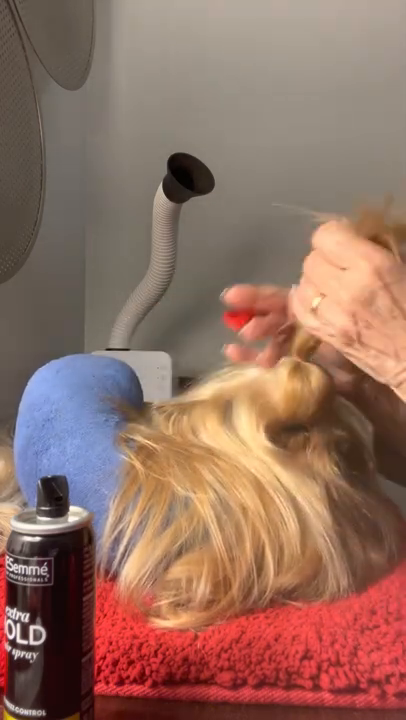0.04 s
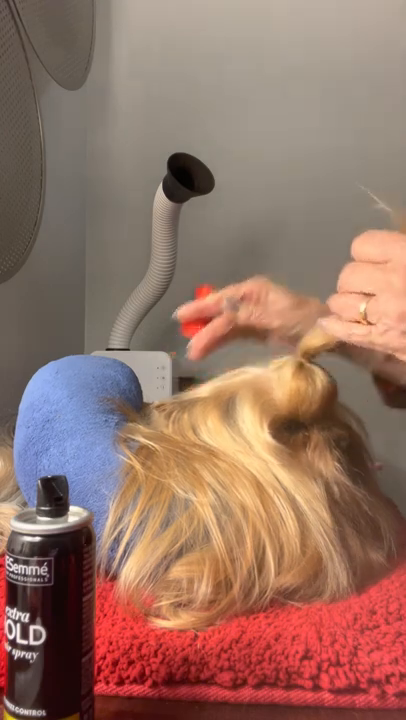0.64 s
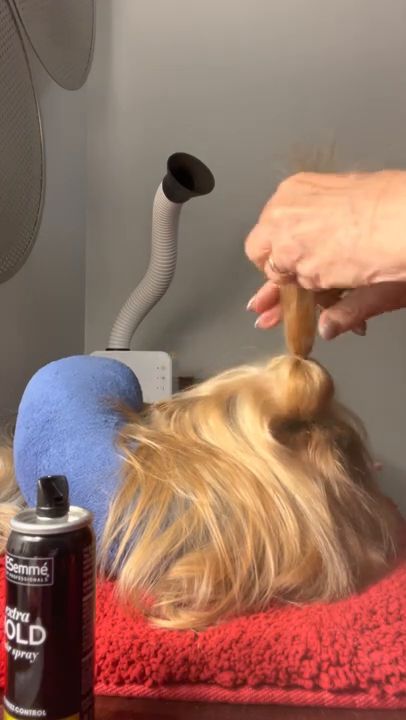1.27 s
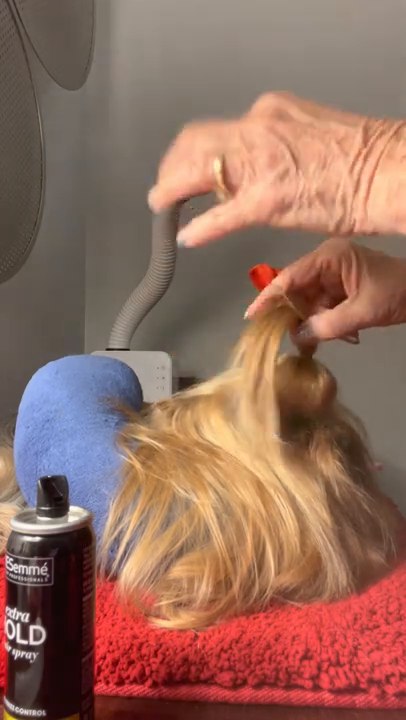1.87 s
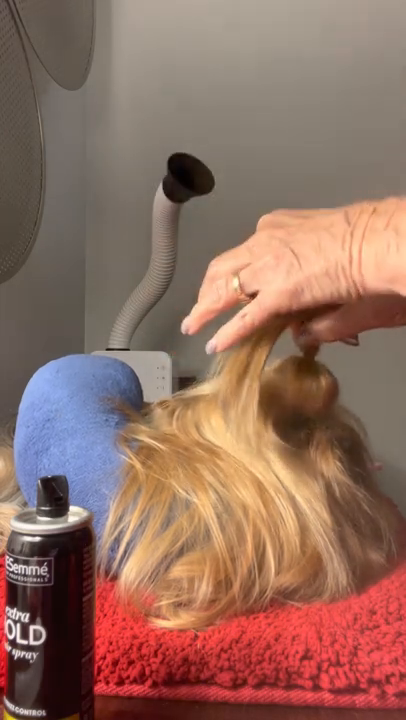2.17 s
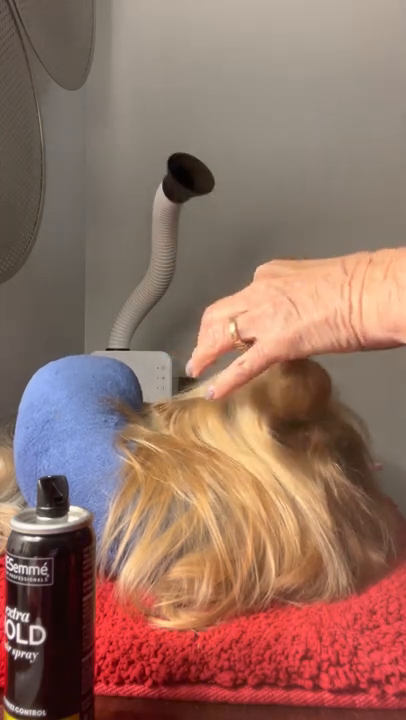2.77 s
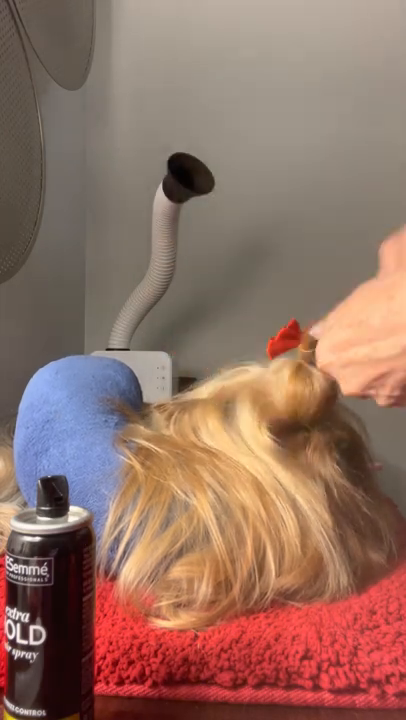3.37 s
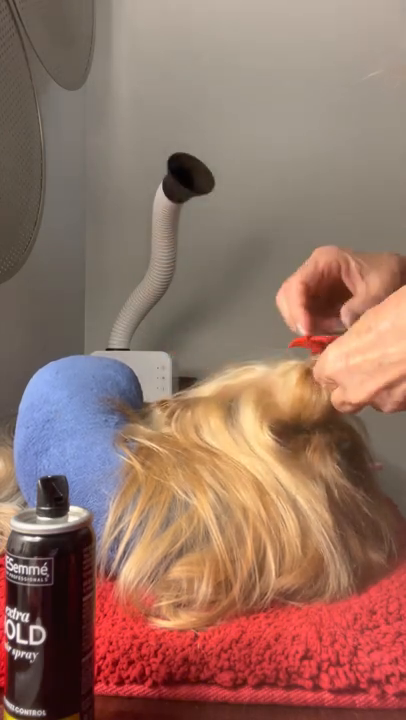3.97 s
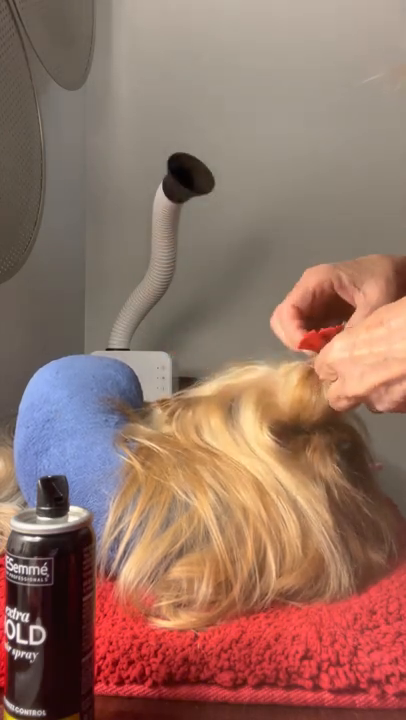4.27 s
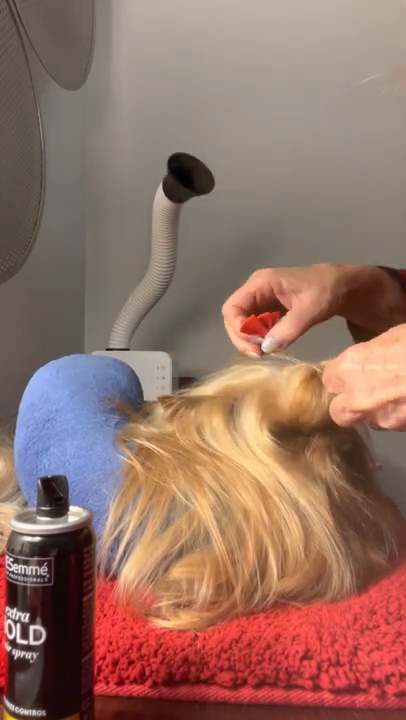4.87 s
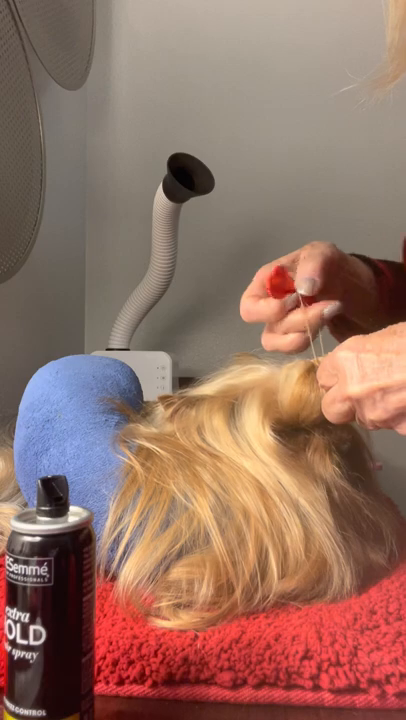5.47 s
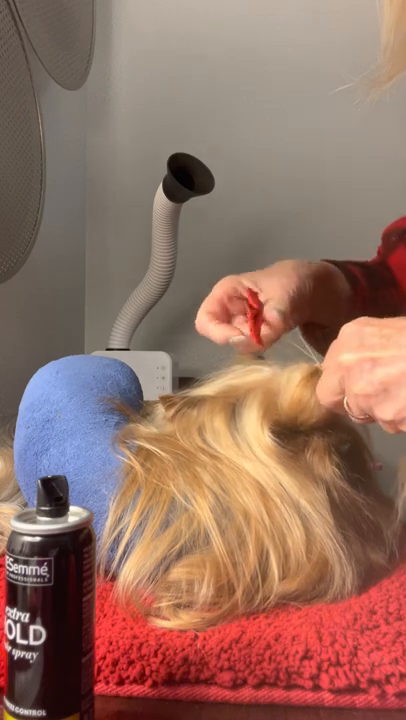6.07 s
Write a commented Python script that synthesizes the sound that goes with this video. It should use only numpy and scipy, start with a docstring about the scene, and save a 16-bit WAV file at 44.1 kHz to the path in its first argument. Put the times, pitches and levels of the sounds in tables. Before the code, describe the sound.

Close, quiet handling sounds in a small room, over the steady low hum of a fan. First comes a cloth swish and a muffled table thump, then light hissy strokes of fingers on hair and one sharp click of a small metal clasp. In the second half, hair and an elastic band crackle and rasp between the fingers, with a couple of dull flicks and one crisp slap shortly before the end.

```python
"""A small room with a grooming table, where a fan motor hums and stirs the air.
Hands gather a dog's topknot and ready a small bow. A sleeve brushes past and the forearm bumps the
table. Hair and an elastic band rub through the fingers by stick-slip friction, the band flicks and
slaps back, and a little metal clasp snaps shut and rings in its free modes.
Two close microphone ports hear it all."""
import sys
import numpy as np
from scipy import signal
from scipy.fft import rfft, irfft
from scipy.io import wavfile

SR = 44100
rng = np.random.default_rng(int(sys.argv[2]) if len(sys.argv) > 2 else 0)


def output_pcm(signal):
    """Save a mono or channel-first signal as 16-bit PCM at the path in sys.argv[1].

    Samples are clipped to [-1, 1] before scaling.
    """
    pcm = np.clip(np.atleast_2d(signal).T, -1, 1) * 32767
    wavfile.write(sys.argv[1], SR, np.round(pcm).astype(np.int16))


N = 269892
TIME = np.arange(N) / SR
FREQS = np.arange(N // 2 + 1) * SR / N
SIDES = np.array([[.5], [-.5]])  # splits a difference between left and right


def from_db(db):
    """Amplitude grows tenfold for every 20 dB."""
    return 10 ** (np.asarray(db) / 20)


def unit_rms(x):
    """Normalisation to unit mean power."""
    return x / np.sqrt(np.mean(x ** 2) + 1e-20)


def at_hz(points, hz):
    """Interpolation on a logarithmic frequency axis."""
    freqs, values = np.transpose(points)
    return np.interp(np.log(hz + 0.00092), np.log(freqs), values)


def drift(rate_hz):
    """Low-passed noise: a random fluctuation of unit spread."""
    return unit_rms(irfft(rfft(rng.standard_normal(N)) / (1 + (FREQS / rate_hz) ** 2), N))


def colour(x, spectrum):
    """A minimum-phase filter of unit power gain, falling away below the spectrum's first point."""
    roll_off = np.clip(FREQS / spectrum[0][0], .01, 1) ** 2
    gain = unit_rms(from_db(at_hz(spectrum, FREQS)) * roll_off)
    cepstrum = irfft(np.log(gain), N)
    cepstrum[1:N // 2] *= 2
    cepstrum[N // 2 + 1:] = 0
    return irfft(rfft(x) * np.exp(rfft(cepstrum)), N)


def resonance(x, hz, width_hz):
    """A second-order resonator with unit gain at its centre."""
    return signal.lfilter(*signal.iirpeak(hz, hz / width_hz, fs=SR), x + 1e-18)


def narrowband(x, hz, width_hz):
    """A resonator scaled to conserve the power of white noise."""
    return np.sqrt(SR / (np.pi * width_hz)) * resonance(x, hz, width_hz)


def passband(x, hz, kind, order=2):
    """A maximally flat low-, high- or band-pass filter."""
    return signal.sosfilt(signal.butter(order, hz, kind, fs=SR, output="sos"), x + 1e-18)


def friction(slips_per_s, grain, flutter_db):
    """Stick-slip noise: countless tiny slips and a few larger ones, under an uneven grip."""
    large_slips = unit_rms((rng.random(N) < slips_per_s / SR) * rng.standard_normal(N))
    grip_db = flutter_db * (drift(37) + drift(300))  # changing pressure, and strands letting go
    return unit_rms((rng.standard_normal(N) + grain * large_slips) * from_db(grip_db))


def burst(start, decay_s):
    """Crowded micro-impacts make noise with an exponential decay."""
    envelope = (TIME >= start) * np.exp(-np.clip((TIME - start) / decay_s, 0, 40))
    return envelope * rng.choice([-1, 1], N)


def short_bursts(rows):
    """Exponential decay: each burst of noise dies within milliseconds."""
    noise = np.zeros(N)
    for start, db, decay_s in rows:
        at = round(start * SR)
        age = TIME[:min(SR // 40, N - at)]
        noise[at:at + len(age)] += from_db(db) * np.exp(-age / decay_s) * rng.choice([-1, 1], len(age))
    return noise


# Each row: frequency in Hz, coherence between the ports from 0 to 1.
COHERENCE = [(50, 0.3), (90, 0.5), (140, 0.6), (230, 0.4), (420, 0.2), (550, 0.89), (950, 1), (1400, 0.5),
             (2100, 0.64), (4600, 0.4), (7000, 1), (10500, 0.7), (12500, 1)]

def diffuse(pair):
    """A diffuse field arrives from all around, so it is only partly coherent at two points."""
    coherence = np.clip(at_hz(COHERENCE, FREQS), 0, 1)
    mid, side = rfft(pair)
    return irfft(np.sqrt((1 + coherence) / 2) * mid + np.sqrt((1 - coherence) / 2) * side * [[1], [-1]], N)


# Each row: frequency in Hz, reverberation time in seconds.
TAIL_T60 = [(300, 0.5), (3000, 1.18), (9000, 0.76), (16000, 2.5)]
# Each row: frequency in Hz, relative level of the tail in dB.
TAIL_SPECTRUM = [(400, 11.5), (2500, 1.5), (6000, -15), (11000, -12.5), (15000, -16.5)]

def room(x, early_db=-11, early_t60=0.17, tail_db=-16, gap_s=0.0025):
    """Reverberation: early reflections from table and wall, then a faint tail, weaker in the treble."""
    age = TIME[:SR * 3 // 4]
    onset = np.clip(age / gap_s - 1, 0, 1)
    early = rng.standard_normal((2, len(age))) * onset * 1000 ** (-age / early_t60)
    tail = 0
    edges_hz = [100, 1500, 4000, 7000, 10000, 13000, 18000]
    for low, high in zip(edges_hz, edges_hz[1:]):
        noise = passband(rng.standard_normal((2, len(age))), [low, high], "band")
        hz = np.sqrt(low * high)
        decay = 1000 ** (-age / at_hz(TAIL_T60, hz))
        tail += from_db(at_hz(TAIL_SPECTRUM, hz)) * noise * onset * decay
    response = (from_db(early_db) * unit_rms(early) + from_db(tail_db) * unit_rms(tail)) / np.sqrt(len(age))
    return diffuse(signal.fftconvolve(x[None], response, axes=1)[:, :N])


# Each row: frequency in Hz, relative spectral density in dB.
AIR_SPECTRUM = [(27, 0), (38, 6), (75, 5.5), (95, -3.5), (140, -5.5), (250, -10), (350, -20), (550, -19.5),
                (850, -23.5), (1400, -32), (2400, -41.5), (3500, -46.5), (5000, -52.5), (15000, -58)]
# Each row: resonance frequency in Hz, bandwidth in Hz, lift in dB.
HOUSING_MODES = [(299, 18, 5), (359, 12, 1), (811, 110, 2.5), (1160, 45, 2), (2056, 290, 7.5),
                 (2640, 84, 10), (3150, 170, 3)]

def fan_air(level_db=-47.5):
    """Broadband flow noise: a steady, dull rush lifted at the resonances of the fan's housing."""
    rush = colour(rng.standard_normal((2, N)), AIR_SPECTRUM)
    for hz, width_hz, lift_db in HOUSING_MODES:
        rush += (from_db(lift_db) - 1) * resonance(rush, hz, width_hz)
    return from_db(level_db) * diffuse(rush)


def wavering(hz, depth):
    """Random modulation in quadrature makes a tone wander in strength and phase."""
    phase = 2 * np.pi * (hz * TIME + rng.random())
    return (1 + depth * drift(5.7)) * np.sin(phase) + depth * drift(8.8) * np.cos(phase)


# Each row: time in seconds, relative level of the fundamental in dB.
HUM_LEVELS = [(0.0, -45), (0.07, -45), (0.31, -43), (0.38, -40), (0.59, -42), (0.65, -50.5), (0.87, -49),
              (0.9, -40.5), (1.29, -42.5), (1.53, -54), (1.6, -43.5), (1.76, -39), (1.92, -42), (2.15, -52),
              (2.42, -36), (2.8, -43.5), (3.2, -49), (3.29, -41), (3.6, -38.5), (3.94, -41), (4.0, -47.5),
              (4.42, -51), (4.81, -44), (5.45, -45.5), (5.74, -52), (6.12, -44)]
# Each row: time in seconds, left minus right level in dB before centring and scaling.
HUM_BALANCE = [(0.0, -7), (0.17, 3.5), (0.56, -15.5), (0.87, 3), (1.33, -20.5), (1.4, -7), (2.64, -5),
               (2.91, -19.5), (3.17, -2), (3.97, -16), (4.45, 4.5), (5.52, -21.5), (5.88, 11), (6.12, -6.5)]
# Each row: time in seconds, relative level of the second harmonic in dB.
OCTAVE_LEVELS = [(0.0, -66), (0.44, -55.5), (1.96, -58), (2.01, -66.5), (2.9, -52), (2.98, -69),
                 (3.05, -52.5), (4.96, -60), (5.08, -48), (5.78, -61.5), (5.86, -51.5), (6.12, -60)]
# Each row: frequency of a weaker tone in Hz, relative level in dB.
MOTOR_TONES = [(177.6, -62.5), (254, -66), (297, -68), (319, -65.5), (379, -78.5), (403.7, -69), (575, -78),
               (1497, -83), (2286, -102.5)]

def fan_motor(hum_hz=59.33, whine_hz=516.4):
    """Modulated tonal noise: a hum that swells and sways between the ears, under wavering tones."""
    phase = 2 * np.pi * hum_hz * TIME + 0.94 * drift(2.3)
    hum_db = np.interp(TIME, *np.transpose(HUM_LEVELS)) + 0.33 + 0.5 * drift(7.9)
    sway_db = np.interp(TIME, *np.transpose(HUM_BALANCE))
    balance_db = 0.83 * (sway_db - sway_db.mean()) - 0.3
    pan = from_db(balance_db * SIDES) / np.cosh(np.log(from_db(balance_db)) / 2)
    hum = pan * from_db(hum_db) * np.sin(phase + 0.64 * drift(0.73) * SIDES)
    octave_db = np.interp(TIME, *np.transpose(OCTAVE_LEVELS)) - 0.5
    octave = from_db(octave_db) * wavering(2 * hum_hz, depth=0.49)
    tones = sum(from_db(db - 4) * wavering(hz, depth=0.57) for hz, db in MOTOR_TONES)
    whine = from_db(-66) * wavering(whine_hz, depth=0.5)
    whine_rush = from_db(-68) * unit_rms(resonance(rng.standard_normal(N), whine_hz, width_hz=30))
    return np.sqrt(2) * (hum + octave + tones + whine) + whine_rush


# Each row: start in seconds, envelope peak in dB, frequency in Hz.
TABLE_BUMPS = [(0.341, -38, 137.2), (0.528, -47.5, 188)]

def table_bumps(swell_s=0.013):
    """Damped vibration: bumped by the forearm, the padded table swings up and dies away."""
    bumps = np.zeros(N)
    for start, db, hz in TABLE_BUMPS:
        age = np.maximum(TIME - start, 0)
        rise = age / swell_s
        envelope = rise * np.exp(1 - rise) * (rise < 20)
        bumps += from_db(db) * envelope * np.sin(2 * np.pi * hz * age)
    return bumps


# Each row: start in seconds, level in dB, centre frequency in Hz.
SLEEVE_FOLDS = [(.303, -55.5, 1710), (.323, -52.5, 1500), (0.336, -53, 3560), (0.338, -44.5, 880),
                (0.344, -47, 720), (0.345, -50.5, 238), (0.346, -59, 1970), (0.36, -53, 2300),
                (0.366, -51, 573), (.398, -59, 1590), (0.422, -48.5, 1640), (0.426, -54, 2340),
                (0.436, -57, 1560), (0.446, -53.5, 2280), (0.455, -61, 2800), (0.515, -53, 1500),
                (0.522, -47, 770), (0.527, -59, 2400)]

def folds(rise_s=0.0011, settle_s=0.007, cycles=2.8):
    """Heavily damped resonance: folds flop with hollow puffs, larger ones lower and longer."""
    puffs = np.zeros(N)
    for start, db, hz in SLEEVE_FOLDS:
        flop = np.clip((TIME - start) / rise_s, 0, 1) * burst(start, settle_s + cycles / hz)
        puffs += from_db(db) * narrowband(flop, hz, width_hz=0.4 * hz)
    return passband(puffs, 3800, "low")


# Each row of both: frequency in Hz, relative spectral density in dB.
DRAG_SPECTRUM = [(90, 4.5), (140, 23), (220, 1), (400, -7), (800, 3), (1150, -1), (2300, -2.5),
                 (3200, -8.5), (5000, -12), (9000, -27)]
FIBRE_SPECTRUM = [(2000, -2), (5000, -2), (8000, -4.5), (11000, -8.5), (15500, -10)]

def sleeve(touch_s=0.14, full_speed_s=0.34, slowing_s=0.44, leave_s=0.9):
    """Sliding friction grows with speed: in one pass the cloth drags, its fibres hiss, its folds flop."""
    before, after = np.maximum(full_speed_s - TIME, 0), np.maximum(TIME - slowing_s, 0)
    apart = np.maximum(touch_s - TIME, 0) + np.maximum(TIME - leave_s, 0)
    drag_db = -61.5 - 9 * before - 37 * after  # slopes in dB per second
    flurry_db = 6.5 * np.exp(-((TIME - 0.525) / 0.019) ** 2)  # the last fold slides off
    hiss_db = -63 - 49 * before - 33.5 * after - 131 * apart + flurry_db
    drag = colour(friction(slips_per_s=510, grain=0.46, flutter_db=0), DRAG_SPECTRUM)
    hiss = colour(friction(slips_per_s=1500, grain=0.1, flutter_db=0.8), FIBRE_SPECTRUM)
    return from_db(drag_db) * drag + from_db(hiss_db) * hiss + folds()


def stroke(start, length, db, swell_db=3, attack_s=0.0018, release_s=0.0045, graze_s=0.02):
    """Friction follows tension: the skin grazes, grips and rubs harder until the strands slip free."""
    before, after = np.maximum(start - TIME, 0), np.maximum(TIME - start - length, 0)
    tension = np.clip((TIME - start) / length, 0, 1)
    grip = np.exp(-np.minimum(before / attack_s + after / release_s, 20))
    graze = from_db(-12.5) * np.exp(-np.minimum((before + after) / graze_s, 20))
    return from_db(db + swell_db * (tension - 1.5)) * np.maximum(grip, graze)


def stray_strands(from_s=4.0, per_s=31, db=-60, decay_s=0.0004):
    """A random point process: single strands catch and crackle while the band is worked."""
    caught = (rng.random(N) < per_s / SR) & (TIME > from_s)
    return short_bursts([(start, db, decay_s) for start in TIME[caught]])


def shifting_grip(hiss, spread_db=3):
    """Band-wise modulation: as the grip moves along the strands, parts of the treble come and go."""
    centres_hz = np.linspace(3000, 15000, 6)
    spectrum = rfft(hiss)
    bands = [irfft(spectrum * np.interp(FREQS, centres_hz, share), N) for share in np.eye(6)]
    return sum(band * from_db(spread_db * drift(42)) for band in bands)


# Finger strokes, except at 2.551 s: that row is a faint, brief hiss just before the snap.
# Each row: start in seconds, length in seconds, level in dB, relative pinch level in dB, tilt in dB.
HISSES = [(0.115, 0.022, -70, -20, 18), (0.746, 0.037, -67, -5, -1), (1.558, .11, -86, -11, 14),
          (2.392, 0.04, -61, -7, 0.5), (2.49, 0.0093, -56.5, -6, -2), (2.512, 0.03, -59, -10, 5),
          (2.551, 0.012, -51, -10, 10), (2.596, 0.027, -60.5, 0.5, -4), (2.642, 0.057, -64, -5.5, -3),
          (2.734, 0.16, -76, -4, 3), (2.93, 0.027, -67.5, -5, 1.5), (3.005, 0.0037, -56, -5, 5),
          (3.229, 0.13, -81, 3, 8), (3.493, 0.027, -69.5, -3.5, -2), (4.003, 0.086, -69, -1.5, 6),
          (4.177, 0.038, -65, -5, 5), (4.341, 0.014, -58, -2.5, 6), (4.377, 0.16, -74, -0.5, 6),
          (4.475, 0.012, -70, -1, 2), (4.506, 0.033, -61.5, -7, -1), (4.535, 0.109, -60, -7, -1),
          (4.685, 0.018, -64, -7, 8), (4.977, 0.009, -64.5, -10, 1), (4.985, 0.031, -58, -6.5, -2),
          (5.031, 0.047, -66, -9.5, 5), (5.139, 0.021, -65, -18.5, 4), (5.358, 0.056, -69, -2.5, 4),
          (5.487, 0.014, -52, -10.5, 3), (5.511, 0.047, -66.5, -4, 4), (5.644, 0.006, -46, -11.5, 3),
          (5.678, 0.021, -55.5, -4, 5), (5.707, 0.016, -55.5, -5, 8), (5.803, 0.01, -50.5, -3, 4),
          (5.909, 0.0087, -56.5, -10, 4), (5.928, 0.057, -52.5, -8.5, 7), (6.096, 0.023, -61, -10, 5)]
# Nails and catching strands. Each row: start in seconds, relative level in dB.
NAIL_TICKS = [(1.1234, -57.5), (1.4285, -55.5), (2.138, -59), (2.174, -59), (2.256, -51.5), (2.3846, -44),
              (2.431, -49), (2.478, -41), (2.4887, -41), (2.4932, -51), (2.4995, -46), (2.536, -41.5),
              (3.317, -58.5), (3.489, -42.5), (4.0005, -42), (4.005, -48), (4.032, -43.5), (4.0615, -43.5),
              (4.159, -58), (4.356, -47), (4.6365, -44), (4.6809, -44.5), (4.6926, -53), (4.7215, -52),
              (4.73, -55), (4.807, -52), (4.841, -58), (4.906, -40), (5.074, -57), (5.293, -56),
              (5.404, -54), (5.441, -56), (5.4797, -49), (5.499, -50), (5.751, -49), (5.898, -46),
              (5.911, -42), (5.944, -50), (5.975, -41), (5.981, -37)]
# Each row of both: frequency in Hz, relative spectral density in dB.
RUB_SPECTRUM = [(2500, -20.5), (4200, -3.5), (5000, 4.5), (5700, 12), (6700, 4.5), (7900, 6), (9500, 3),
                (12000, 0.5), (13400, 1.5), (15500, -2)]
PINCH_SPECTRUM = [(1000, -10), (1600, -15.5), (2100, -1.5), (2700, -5), (3400, -3), (4600, -4),
                  (7000, -30.5)]

def fingers(tilt_hz=10500, tick_decay_s=0.0015):
    """Friction of hair and elastic in the fingers: a hiss, the pinch's duller body and small ticks."""
    dull, bright, pinch = np.zeros((3, N))
    for start, length, db, pinch_db, tilt_db in HISSES:
        envelope = stroke(start, length, db)
        dull += from_db(-tilt_db / 2) * envelope
        bright += from_db(tilt_db / 2) * envelope
        pinch += from_db(pinch_db) * envelope
    slips = friction(slips_per_s=450, grain=0.49, flutter_db=0.34)
    ticks = short_bursts([(start, db, tick_decay_s) for start, db in NAIL_TICKS]) + stray_strands()
    tilted = passband(dull * slips, tilt_hz, "low", order=3)
    tilted += passband(bright * slips, tilt_hz, "high", order=3)
    hiss = shifting_grip(colour(tilted + from_db(-8) * ticks, RUB_SPECTRUM))
    body = colour(pinch * slips + from_db(-16) * ticks, PINCH_SPECTRUM)
    return hiss + body


# Each row: start in seconds, length in seconds, level in dB, centre frequency in Hz.
STRAND_PULLS = [(2.397, 0.027, -70, 7900), (2.489, .011, -55.5, 8100), (2.525, 0.016, -53, 8700),
                (4.981, 0.022, -58, 8350), (5.487, .014, -65, 9100), (5.67, .028, -51, 5160),
                (5.947, 0.032, -50.5, 8040)]

def strand_zips(width_hz=900):
    """Nearly periodic slipping gives the hiss of taut strands a thin pitch."""
    slips = friction(slips_per_s=1200, grain=0.4, flutter_db=3.5)
    return sum(narrowband(stroke(start, length, db) * slips, hz, width_hz)
               for start, length, db, hz in STRAND_PULLS)


# Each row: start in seconds, level in dB, rise time in seconds.
BAND_JERKS = [(4.343, -63, .004), (4.353, -54, 0.0035), (4.495, -58, .004), (4.511, -55, .003),
              (4.524, -56, .003), (4.534, -58, 0.0054), (4.551, -58, 0.0022), (4.564, -53, 0.0017),
              (4.571, -54, .002), (4.5836, -53.5, .0016), (4.598, -57, 0.0035), (4.6175, -57.5, 0.0027),
              (4.633, -51, 0.0022)]
# Each row: frequency in Hz, bandwidth in Hz, gain in dB.
RASP_MODES = [(3600, 290, -11.5), (4770, 780, -4.5), (5950, 410, -9), (7730, 580, -12.5), (10550, 780, -11),
              (13500, 700, -15)]

def band_rasp(spread_db=5):
    """Stick-slip excitation: each jerk of the band over the hair drives its modes in a new mix."""
    shares_db = spread_db * rng.standard_normal((len(BAND_JERKS), len(RASP_MODES), 1))
    forces = np.zeros((len(RASP_MODES), N))
    age = TIME[:SR // 20]
    for (start, db, rise_s), share_db in zip(BAND_JERKS, shares_db):
        at = round(start * SR)
        forces[:, at:at + len(age)] += from_db(db + share_db) * age / rise_s * np.exp(1 - age / rise_s)
    slips = friction(slips_per_s=900, grain=0.56, flutter_db=2)
    return sum(from_db(db) * narrowband(force * slips, hz, width_hz)
               for force, (hz, width_hz, db) in zip(forces, RASP_MODES))


# Each row: start in seconds, relative level in dB, decay time in seconds.
BAND_FLICKS = [(4.1803, -50.5, 0.0015), (5.3733, -45, 0.0025), (5.811, -34.5, 0.0014)]
# Each row: frequency in Hz, relative spectral density in dB.
FLICK_SPECTRUM = [(500, -6), (1150, 2), (1800, -17), (2400, -6.5), (3200, -12), (4300, -3), (5400, 2.5),
                  (7000, -5), (8600, -2), (11300, 1), (12800, -3), (15500, 3.5)]
# Each row: frequency in Hz, bandwidth in Hz, gain in dB.
SLAP_MODES = [(1130, 300, -6), (3150, 700, -3), (5300, 640, 1.5), (6450, 510, 0.5), (8500, 880, 1),
              (10100, 760, 2), (11300, 1000, 1.5), (13700, 600, -2), (15300, 800, -2)]

def band_flicks(slap_s=5.8103):
    """Heavy damping: the elastic gives dead flicks and, let go at full stretch, one sharp slap."""
    impulse = from_db(-10) * signal.unit_impulse(N, round(slap_s * SR))
    slap = sum((-1) ** k * from_db(db) * resonance(impulse, hz, width_hz)
               for k, (hz, width_hz, db) in enumerate(SLAP_MODES))
    return slap + from_db(4.5) * colour(short_bursts(BAND_FLICKS), FLICK_SPECTRUM)


# Each row: frequency in Hz, level in dB, time to fall 60 dB in seconds.
STEEL_MODES = [(3910, -54.5, .04), (6970, -45.5, .012), (7460, -60.5, 0.17), (8260, -64.5, .25),
               (8460, -37.5, 0.02), (8963, -57.5, .21), (9302, -53, .16), (10110, -26.5, 0.013),
               (10120, -52, .24), (10200, -52, .2), (10900, -51, .18), (11620, -35.5, 0.01),
               (11770, -55, 0.2), (12190, -59.5, .15), (12400, -59, 0.18), (12960, -61.5, .18),
               (13830, -44, 0.021), (15300, -45.5, .015)]
# Countless weak overtones. Each row: frequency in Hz, relative spectral density in dB.
SHIMMER_SPECTRUM = [(5500, 2.5), (7200, 1.5), (9500, 7.5), (12500, 3.5), (15500, -2)]
# Each row: start in seconds, relative level in dB, decay time in seconds.
# The first two rows are a faint, brief hiss just before the snap.
SNAP_BURSTS = [(2.5523, -43, .0007), (2.5543, -43, .0008), (2.5617, -34.5, .0006), (2.5622, -27.5, 0.0004),
               (2.5628, -26, 0.00034), (2.5635, -30.5, 0.0006), (2.5643, -25, 0.0004),
               (2.5654, -25.5, 0.00023), (2.566, -32, .0015), (2.5755, -42, .0004), (2.6082, -48, .0008)]
# Each row: frequency in Hz, relative spectral density in dB.
CRACK_SPECTRUM = [(2200, -27.5), (2700, -14), (3500, -10.5), (4200, -11.5), (5200, -9), (7000, 2),
                  (9500, -2), (12500, -0.5), (15500, -9.5)]

def clasp(shut_s=2.5624):
    """Impact and free vibration: the clasp cracks shut and settles; its spring steel rings on."""
    age = np.maximum(TIME - round(shut_s * SR) / SR, 0)
    ring = sum(from_db(db) * 1000 ** (-age / t60) * np.sin(2 * np.pi * hz * age)
               for hz, db, t60 in STEEL_MODES)
    shimmer = from_db(-65) * colour(burst(shut_s, decay_s=0.11), SHIMMER_SPECTRUM)
    crack = from_db(3) * colour(short_bursts(SNAP_BURSTS), CRACK_SPECTRUM)
    return crack + shimmer, ring


def scene():
    """Direct and reflected sound add; the sleeve, farther off than the hands, has more of the room."""
    rub = fingers() + band_rasp() + strand_zips()
    snap, ring = clasp()
    flicks, cloth = band_flicks(), sleeve()
    direct = rub + snap + ring + flicks + from_db(1.5) * cloth + table_bumps()
    reflected = room(from_db(2.5) * rub + from_db(3.5) * snap + from_db(-2) * (ring + flicks)
                     + from_db(7) * cloth)
    return direct + reflected + fan_motor() + fan_air()


# Each row: frequency in Hz, phase lead of the left port in radians.
PORT_LEAD = [(60, -1.3), (120, -.4), (220, -.2), (350, 2.5), (750, 2.2), (1150, 2.4), (1600, -.4),
             (3900, -.5), (4700, -2.8), (5800, -3.95), (8300, -4.5), (12300, -6), (15500, -6.65)]
# Each row: frequency in Hz, left minus right level in dB.
PORT_LEVELS = [(60, -6), (120, -3), (220, -10), (400, -5), (1300, 0.5), (2400, 0), (15000, 0)]

def record(dry, cutoff_hz=15900):
    """Two ports differ in phase and level at each frequency; a steep low-pass cuts the top."""
    gain = from_db(SIDES * at_hz(PORT_LEVELS, FREQS))
    phase = SIDES * at_hz(PORT_LEAD, FREQS)
    heard = irfft(rfft(dry) * gain * np.exp(1j * phase), N)
    return signal.sosfilt(signal.ellip(10, .2, 80, cutoff_hz, fs=SR, output="sos"), heard)


dry = scene()
out = record(dry)
output_pcm(out)
```